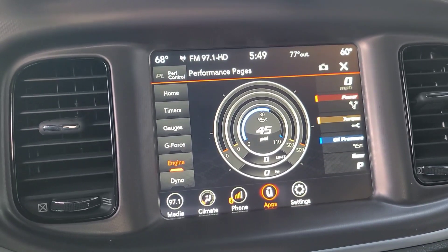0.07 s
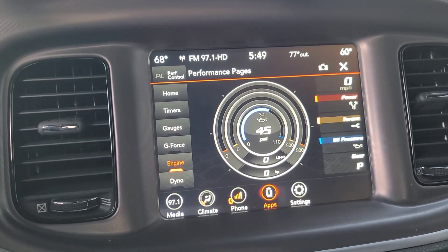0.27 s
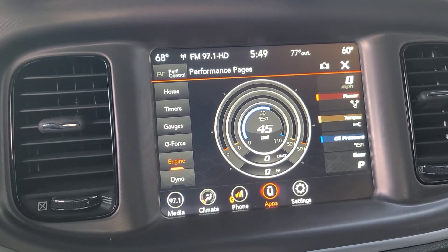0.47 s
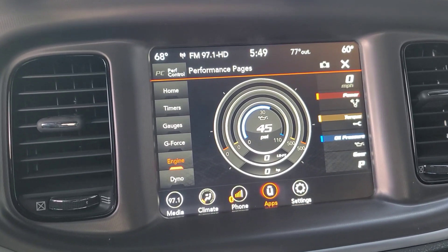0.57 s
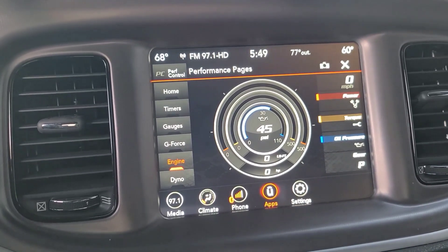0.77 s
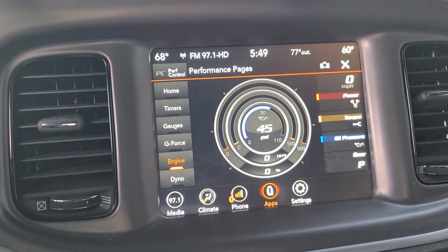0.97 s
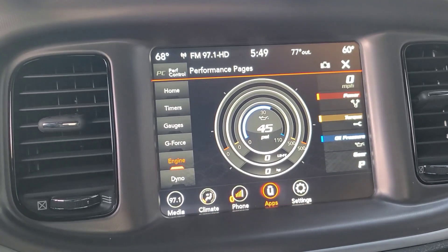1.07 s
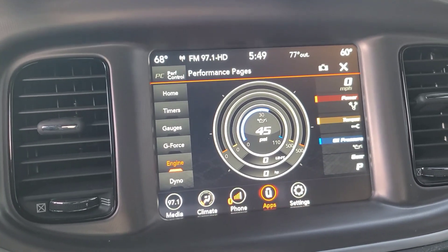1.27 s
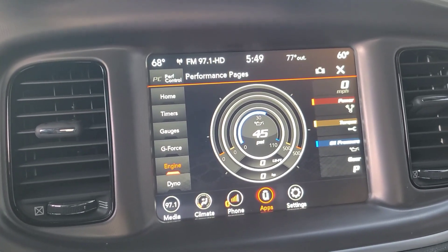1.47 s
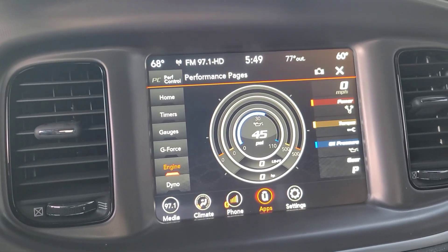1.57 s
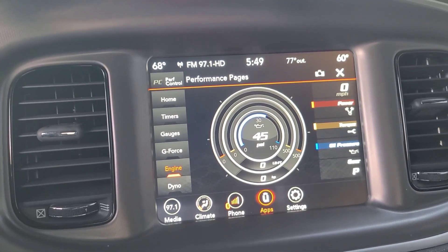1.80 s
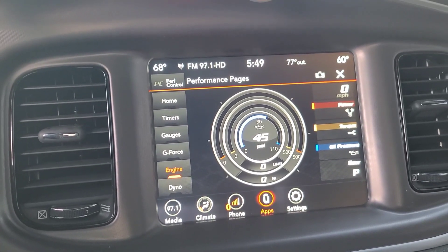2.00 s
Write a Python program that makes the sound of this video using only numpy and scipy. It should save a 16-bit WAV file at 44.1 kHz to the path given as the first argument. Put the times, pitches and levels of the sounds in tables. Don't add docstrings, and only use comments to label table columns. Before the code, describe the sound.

Inside a parked car, a powerful engine revs up for an instant, rattles as the throttle shuts, then winds down into a low throbbing rumble, boomy and muffled, with faint airflow and gentle bumps on the handheld microphone.

```python
import sys
import numpy as np
from scipy import signal
from scipy.fft import rfft, irfft
from scipy.io import wavfile
from scipy.ndimage import uniform_filter1d

SR = 44100
rng = np.random.default_rng(int(sys.argv[2]) if len(sys.argv) > 2 else 0)


def makeup_ratio(level_db):
    decades = np.asarray(level_db, float) / 20
    return 10 ** decades


def wav_record(signal):
    frames = np.transpose(np.atleast_2d(signal))
    bounded = np.clip(frames, -1, 1)
    quanta = np.round(bounded * 32767).astype(np.int16)
    wavfile.write(sys.argv[1], SR, quanta)


N = 89919

# (frequency [Hz], width [Hz], level [dB])
CABIN_MODES = [(58.7, 12, 2.5), (100, 11, -1.5), (114, 18, -11.5), (164.2, 12.9, -1), (205.2, 38, -9.5),
               (282, 7, -18), (364, 22, -14.5), (428, 62, -16)]
# (frequency [Hz], width [Hz], level [dB])
DUCT_RINGS = [(1743, 285, 7.5), (1120, 47, -1), (8260, 660, 8), (6650, 180, -6)]


def evened(x):
    return x / np.sqrt(np.mean(x ** 2) + 1e-20)


def read(points, hz):
    f, value = np.transpose(points)
    return np.interp(np.log(hz + 1), np.log(f + 1), value)


def control(column):
    # (time [s], firing rate [Hz], firing tone [dB], load [dB])
    course = np.array([(0, 97.9, -7.5, -24.5), (0.041, 110.2, -9.5, -23), (0.059, 114.8, -16.5, -15),
                       (.072, 125, -43, -23), (.12, 149.5, -27, -21.5), (0.181, 165.6, -24, -30),
                       (0.301, 153.8, -26.5, -28), (0.431, 138.4, -32.5, -28.5), (.56, 120.9, -23, -25),
                       (0.749, 107.2, -23.5, -30.5), (.89, 101, -14.5, -34.5), (1.122, 96.04, -18.5, -41),
                       (1.222, 89.2, -24, -38), (1.372, 84.24, -31, -46.5), (1.529, 72.77, -32.5, -42.5),
                       (1.67, 68.3, -31, -41), (1.892, 61.82, -25, -39), (2.04, 59.16, -18.5, -40.5)])
    return np.interp(np.arange(N) / SR, course[:, 0], course[:, column])


def cycles():
    return np.cumsum(control(column=1)) / SR / 8


def follow(share):
    return makeup_ratio(-32.5 + share * (control(column=3) + 36.5))


def resonate(x, hz, width):
    turn = np.exp(2j * np.pi * hz * np.arange(x.shape[-1]) / SR)
    r = np.exp(-np.pi * width / SR)
    smooth = signal.lfilter([1 - r], [1, -r], x / turn)
    return 2 * (turn * smooth).real


def hiss(shape, rings=(), patchy_db=0.0):
    frames = N // 256 + 5
    hz = np.fft.rfftfreq(2048, 1 / SR)
    a, b, patches = rng.standard_normal((frames // 2, 1025, 3)).T
    patches = uniform_filter1d(patches, size=20, axis=0)
    patches = evened(uniform_filter1d(patches, size=6, axis=1))
    colour_db = read(shape, hz) + sum(db * np.exp(-((hz - f) / w) ** 2) for f, w, db in rings)
    z = (a + 1j * b) * makeup_ratio(colour_db[:, None] + patchy_db * np.tanh(patches))
    return evened(signal.istft(z, nperseg=2048, noverlap=1536)[1][:N])


def settling():
    t = np.arange(N) / SR
    shut_s, shut_db = 0.2, -14
    emerge = makeup_ratio(shut_db * np.clip(1 - (t / shut_s) ** 2, 0, 1))
    lope_s, peak_s, from_s, to_s = 0.088, 1.903, 1.6, 2.04
    depth = 0.45 * np.clip(np.minimum(t - from_s, to_s - t) / lope_s, 0, 1)
    lope = 1 + depth * np.cos(2 * np.pi * (t - peak_s) / lope_s)
    return emerge, lope


def exhaust():
    order_k = [2, 3, 5, 6, 7, 9, 10, 11, 12, 13, 14, 15, 16, 17, 19, 21]
    order_db = [1, 1, 0.5, 4, -9.5, 8.5, -1.5, 1.5, 0.5, -8.5, -3.5, -10, 1.5, -8, -18, -4]
    orders_db, orders_follow = -2, 0.58
    wander_s, wander_db = 0.026, 2.2
    cycle_hz, turned = control(column=1) / 8, cycles()
    orders = np.zeros(N)
    for k, db in zip(order_k, order_db):
        power = sum(makeup_ratio(2 * d) / (1 + (2 * (k * cycle_hz - f) / w) ** 2) for f, w, d in CABIN_MODES)
        drift = rng.standard_normal((N // 441 + 2, 2))
        drift = evened(signal.lfilter([1], [1, -np.exp(-0.01 / wander_s)], drift, axis=0))
        level, twist = (np.interp(np.arange(N) / 441, np.arange(len(drift)), d) for d in drift.T)
        phase = 2 * np.pi * k * turned + 6 * rng.random() + 0.33 * twist
        orders += makeup_ratio(db + wander_db * level) * np.sqrt(power) * np.cos(phase)
    tone = np.sqrt(2) * makeup_ratio(control(column=2)) * np.cos(2 * np.pi * 8 * turned - 0.6)
    emerge, lope = settling()
    return lope * tone + emerge * makeup_ratio(orders_db) * follow(orders_follow) * orders


def lumps():
    lumps_db, lumps_follow, spread = -15.5, 0.94, 0.3
    fired = np.diff(np.floor(8 * cycles()), prepend=0)
    kicks = fired * rng.standard_normal(N) * makeup_ratio(spread * 1.4 * rng.standard_normal(N))
    rung = sum(makeup_ratio(db) * resonate(resonate(kicks, f, 1.3 * w), f, 3.8 * w) for f, w, db in CABIN_MODES)
    return makeup_ratio(lumps_db) * follow(lumps_follow) * evened(rung)


def valve_knock():
    knock_hz, width_hz, knock_db, knock_follow = 1397, 260, -27.5, 0.98
    fade, offset = 0.16, 0.72
    gate = 0.12 + np.exp(-((cycles() + offset) % 1) / fade)
    struck = resonate(rng.standard_normal(N) * gate, knock_hz, width_hz)
    knock = evened(resonate(struck, knock_hz, 2 * width_hz))
    return makeup_ratio(knock_db) * follow(knock_follow) * knock


def body_roar():
    # (frequency [Hz], level [dB per Hz])
    roar_colour = [(15, -30), (40, -16), (75, -19.5), (170, -5.5), (330, -15), (690, -28), (1100, -39.5),
                   (2500, -84)]
    return makeup_ratio(-10) * follow(0.94) * hiss(roar_colour, patchy_db=2)


def vent_air():
    # (frequency [Hz], level [dB per Hz])
    air_colour = [(100, -18.5), (480, 0), (800, -8.5), (1500, -14), (2500, -13.5), (6000, -30),
                  (10600, -51.5), (15500, -76.5)]
    return makeup_ratio(-48.5) * hiss(air_colour, DUCT_RINGS)


def bursts(events):
    rise_s, ring_s, rough_width, top_hz = 0.003, 0.008, 0.5, 4300
    t, noise = np.arange(N) / SR, rng.standard_normal(N)
    out = np.zeros(N)
    for s, db, fade, f in events:
        if fade < ring_s:
            sound = np.sin(2 * np.pi * f * t)
        else:
            sound = resonate(noise, f, rough_width * f)
            sound = evened(resonate(sound, f, rough_width * f))
        envelope = np.clip((t - s) / rise_s, 0, 1) * np.exp(-np.clip(t - s, 0, 1) / fade)
        out += makeup_ratio(db) * envelope * sound
    return signal.sosfilt(signal.butter(4, top_hz, fs=SR, output="sos"), out)


def intake_snarl():
    # (time [s], level [dB], decay [s], frequency [Hz])
    snarls = [(.036, -33, 0.018, 960), (.030, -39, 0.022, 2600), (.030, -29, .004, 800),
              (.038, -25, .004, 840), (0.029, -30, 0.0052, 1400), (.066, -28, .004, 1050),
              (.083, -30, .006, 1500), (0.054, -38, 0.03, 1600), (.055, -44, .05, 2800),
              (0.052, -39, 0.15, 820), (.002, -40, .04, 1200)]
    return bursts(snarls)


def linkage():
    # (time [s], level [dB], decay [s], frequency [Hz])
    clacks = [
        (.0545, -20, .003, 1950),
        (.0555, -22, .003, 1400),
        (.0612, -18, .004, 1390),
        (.0725, -22, .004, 1950),
        (.0735, -21, .004, 1420),
    ]
    return bursts(clacks)


def surges():
    # (time [s], level [dB], frequency [Hz], half length [s])
    swells = [(.095, -23.5, 112, 0.025), (.1, -31.5, 153.6, .03), (.19, -31.5, 55, 0.017),
              (.21, -38, 377, 0.044), (.21, -36, 277.3, .05), (.31, -28, 59.1, 0.095),
              (.38, -43.5, 369.5, 0.12), (.45, -40.5, 271.5, 0.025), (.5, -28, 98.2, 0.039),
              (.65, -35.5, 162.6, 0.045), (.85, -29.5, 156.5, 0.041), (1.23, -39.5, 155, 0.021),
              (1.302, -30, 91.4, 0.056), (1.41, -20, 98.67, 0.013), (.42, -30, 158.7, .06),
              (.56, -27.5, 161.5, 0.031), (1.459, -32.5, 58, 0.027), (.75, -25, 54.5, .06),
              (1.732, -28.5, 61.4, 0.034), (1.41, -45.5, 295.5, .03), (1.47, -33, 149.4, 0.033),
              (1.53, -28.5, 100, 0.043), (1.545, -28, 56.7, 0.05), (1.82, -44.5, 280.7, 0.048),
              (2.0, -33.5, 126.5, 0.14)]
    t, out = np.arange(N) / SR, np.zeros(N)
    for s, db, hz, half in swells:
        swell = np.exp(-((t - s) / half) ** 2)
        out += np.sqrt(2) * makeup_ratio(db) * swell * np.cos(2 * np.pi * hz * (t - s))
    return out


def handling():
    # (time [s], level [dB], left over right [dB], width [s])
    bumps = [(.2, -33.5, 3, 0.0056), (.33, -27, -1, 0.0048), (0.523, -27, -15, 0.0022),
             (.61, -33, 2, 0.0047), (0.829, -24, 0.5, 0.0031), (1.051, -28.5, -2.5, 0.0021),
             (1.2, -28.5, -3, 0.0028), (1.3, -34, -8, 0.0055), (1.41, -29, 12, 0.0024),
             (1.5, -28, 3, 0.0041), (1.65, -30, 3, 0.0036), (1.76, -24, 0, .003), (1.883, -26, -8, 0.0029),
             (1.9, -22, 17, .0015), (1.96, -27, -4, .0035)]
    t, out = np.arange(N) / SR, np.zeros((2, N))
    for s, db, lean_db, width in bumps:
        u = (t - s) / width
        push = (1 - u ** 2) * np.exp(-u ** 2 / 2)
        sides = makeup_ratio(np.array([[db + lean_db / 2], [db - lean_db / 2]]))
        out += sides * [[1], [-1]] * push
    low_colour = [(20, -14), (60, 2.5), (110, -4.5), (300, -13.5), (900, -64.5)]  # (Hz, dB per Hz)
    flutter = np.array([hiss(low_colour, patchy_db=11) for _ in "LR"])
    return out + makeup_ratio(-27.5 - 7.5) * flutter


def overrun():
    # (frequency [Hz], level [dB per Hz])
    rush_colour = [(300, -29), (700, -2), (1400, -5.5), (2500, -5), (6000, -24.5), (9000, -41),
                   (12000, -62)]
    start_s, rise_s, level_db, fade_db_per_s = 0.25, 0.06, -44.5, -16.5
    u = np.arange(N) / SR - start_s
    return makeup_ratio(level_db + fade_db_per_s * u) * np.clip(u / rise_s, 0, 1) * hiss(rush_colour, DUCT_RINGS)


def bank_beat():
    # (time [s], level [dB])
    beat_level = [
        (0, -56),
        (0.498, -49.5),
        (.66, -27),
        (0.779, -23.5),
        (0.866, -26),
        (.95, -33),
        (1.199, -44),
        (2.04, -36.5),
    ]
    level_db = np.interp(np.arange(N) / SR, *np.transpose(beat_level))
    return np.sqrt(2) * makeup_ratio(level_db) * np.cos(2 * np.pi * 4 * cycles())


def noises():
    return body_roar() + vent_air() + overrun()


def cabin(x):
    # (frequency [Hz], width [Hz], level [dB])
    panels = [(279.3, 18, 4), (368.2, 4.1, 0.5), (455, 19, 4), (559, 11, -1), (699, 15, 5),
              (844.5, 19, 7.5), (1395, 26, 6), (1508, 20, 3), (1520, 6, 3), (1803, 27, 1), (2016, 71, 6)]
    ripple_db, ripple_hz = 2.5, 24.72
    hz = np.fft.rfftfreq(N + 8192, 1 / SR)
    knots = np.arange(0, SR / 2 + 99, ripple_hz)
    ripple = np.interp(hz, knots, rng.standard_normal(4000)[:len(knots)])
    colour_db = ripple_db * ripple + sum(db * np.exp(-((hz - f) / w) ** 2) for f, w, db in panels)
    return irfft(rfft(x, N + 8192) * makeup_ratio(colour_db), N + 8192)[:, :N]


def ports(tones, x, other):
    # (frequency [Hz], likeness [0 to 1])
    likeness = [(60, 0.79), (300, 0.89), (700, 0.77), (1200, 0.46), (1800, 0.39), (3000, 0.083),
                (5000, 0.39), (10000, 0.16)]
    # (frequency [Hz], left over right [dB])
    tilt = [(60, 0.5), (200, 1.85), (900, -2.5), (1500, -10), (3200, -7.5), (4500, -12.5), (8400, -21.5),
            (10000, -15)]
    lead_s, margin = 0.000528, 4096
    hz = np.fft.rfftfreq(N + 2 * margin, 1 / SR)
    padded = np.pad([tones, x, other], [(0, 0), (margin, margin)], "reflect", reflect_type="odd")
    tones, x, other = rfft(padded)
    same = np.clip(read(likeness, hz), 0, 1)
    early = np.exp(2j * np.pi * hz * lead_s * np.clip(hz / 1150, 0, 1) ** 2)
    half_db = read(tilt, hz) / 2
    left = (tones + same * x + np.sqrt(1 - same ** 2) * other) * early * makeup_ratio(half_db)
    right = (tones + x) * makeup_ratio(-half_db)
    return irfft(np.array([left, right]), N + 2 * margin)[:, margin:N + margin]


def scene():
    engine = exhaust() + lumps() + valve_knock() + intake_snarl() + linkage() + surges() + bank_beat()
    air, left_air = cabin(np.array([noises(), noises()]))
    return ports(engine, air, left_air) + handling()


def roll_off(x):
    return signal.sosfilt(signal.butter(12, 15720, fs=SR, output="sos"), x)


def record(dry):
    open_s = 0.0003
    opening = np.sin(np.pi / 2 * np.clip(np.arange(N) / SR / open_s, 0, 1)) ** 2
    return roll_off(dry * opening)


dry = scene()
out = record(dry)
wav_record(out)
```